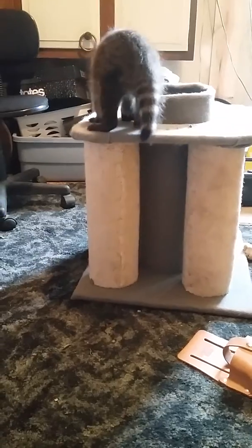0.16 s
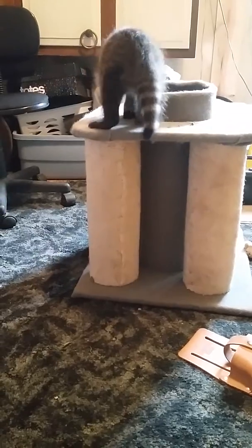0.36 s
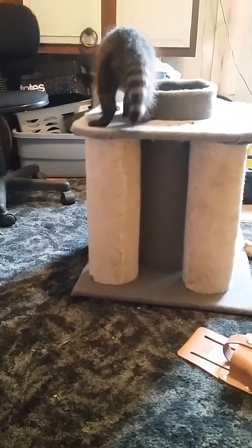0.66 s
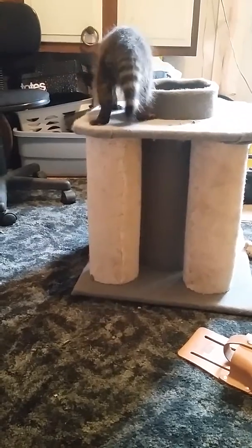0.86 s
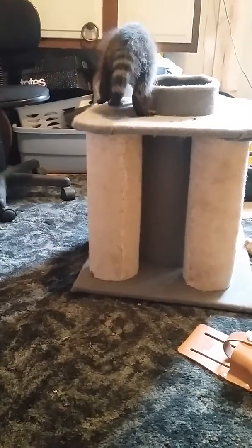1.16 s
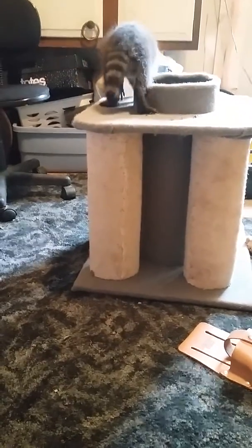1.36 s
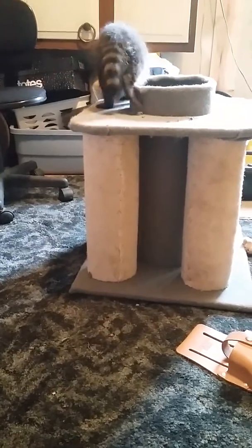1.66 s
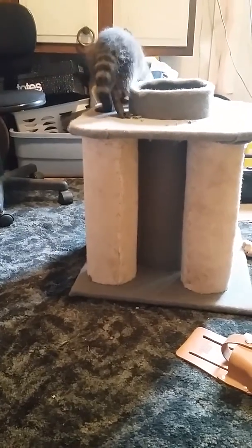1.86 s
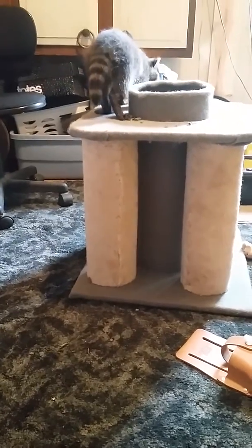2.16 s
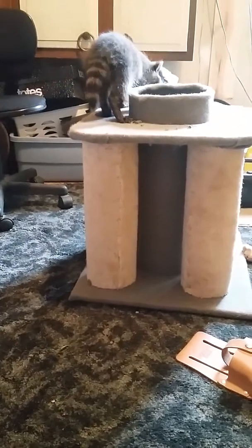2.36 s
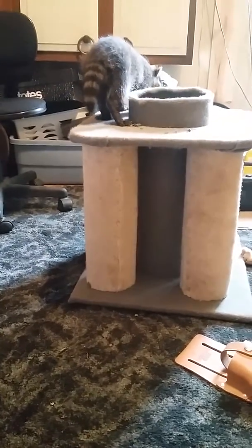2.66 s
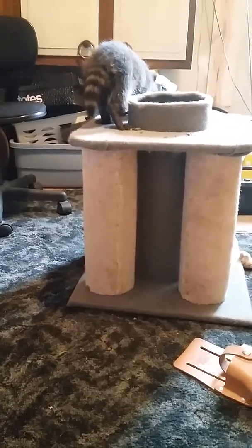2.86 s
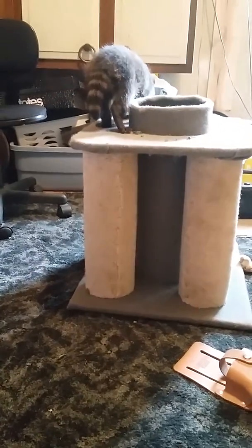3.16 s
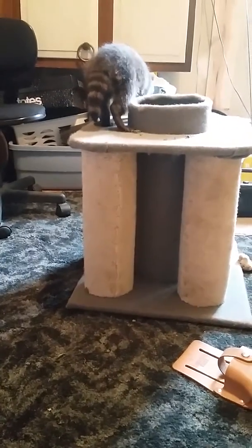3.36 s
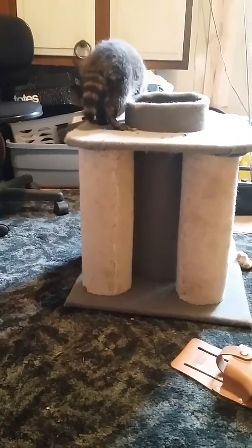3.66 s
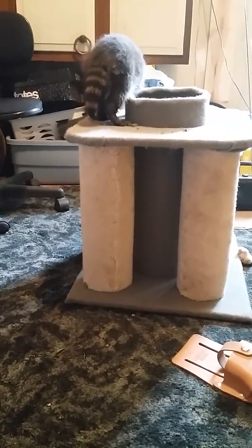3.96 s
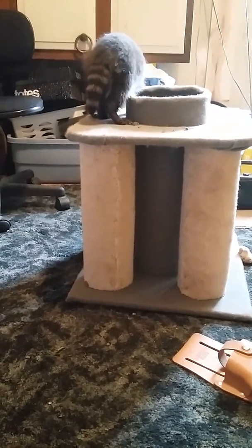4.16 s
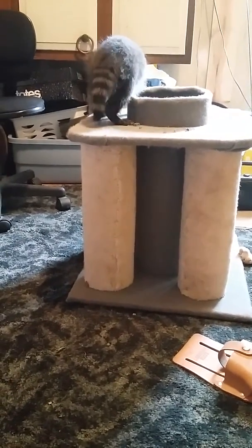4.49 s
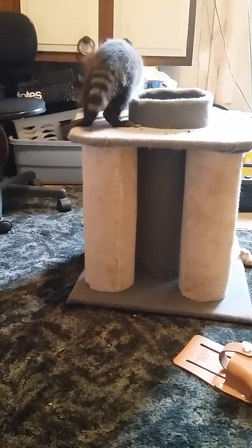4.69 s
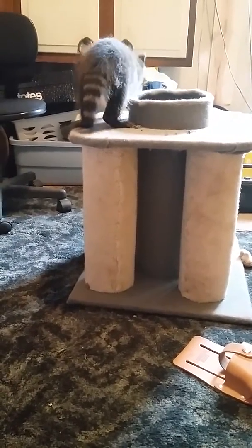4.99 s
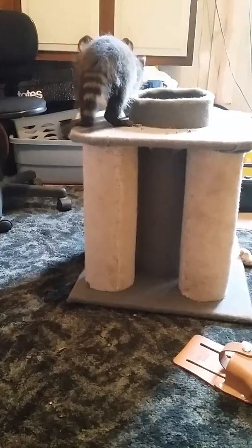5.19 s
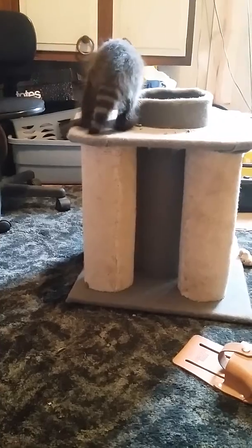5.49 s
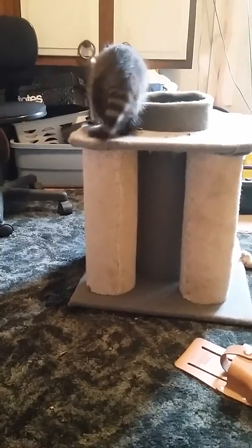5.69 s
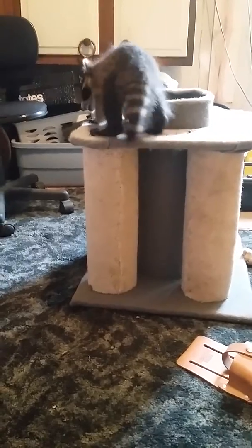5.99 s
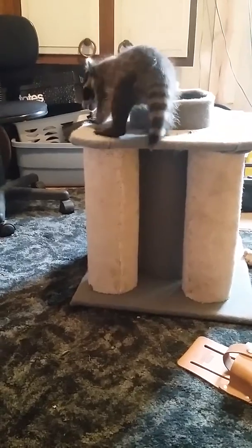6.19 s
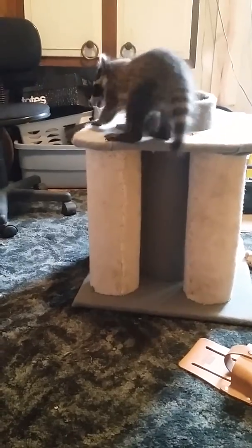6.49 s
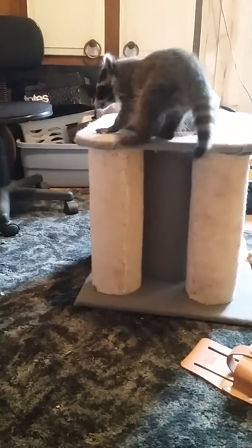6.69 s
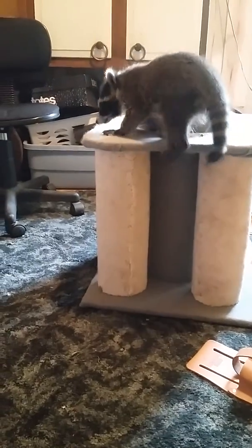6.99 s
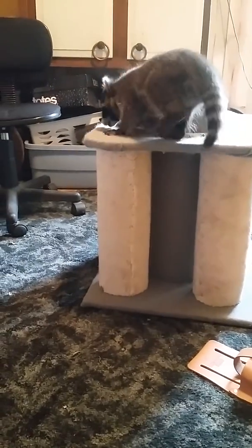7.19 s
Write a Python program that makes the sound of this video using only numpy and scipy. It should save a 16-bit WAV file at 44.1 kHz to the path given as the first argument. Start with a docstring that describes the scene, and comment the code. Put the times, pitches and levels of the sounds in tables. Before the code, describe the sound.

A small room with short reflections, heard by a hand-held stereo camera; the young raccoon is to the right. From 0 to 0.45 s it makes a soft, breathy rattle, about 22 raspy syllables a second with tongue clicks between and a few low croaks. Thin pure whistles, perhaps a bird, peep at 0.7-1.25 s, then slide and dive until 2.1 s. Around them come three quick squawks at 1.55-1.63 s and a tiny rattle at 1.7-1.8 s. A pause holds mostly bumps. At 3.25 s a squawk opens a stronger, more voiced rattle fading by 3.7 s. Squawks at 4.5 and 4.75 s join a long rattle, 4.6-5.35 s, with a sharp click at 4.9 s. Squawks at 5.7-5.9 s lead another, until 6.65 s; two squawks end it at 7.3 s. Throughout, low grip rumble and faint hiss; dull finger thuds cluster at 0-1.3, 1.8-3.9 and 6-7 s, the heaviest near 6.85 s, with faint carpet brushes.

```python
"""A young raccoon chitters on a carpeted cat tree in a small room, right of a hand-held camera.
First a rattle of raspy noise-and-tone syllables, about 22 a second, with tongue clicks (filtered noise) between.
Thin gliding sine whistles, perhaps a bird, follow it and run on past the second bout; later bouts open with
squawks (harmonics plus rasp) before the rattle swells and fades with effort, and squawks alone come last.
Throughout, grip rumble, faint hiss, fingers bumping the left of the camera (sagging sines), soft carpet brushes."""
import sys
import numpy as np
from scipy import signal
from scipy.fft import rfft, irfft, next_fast_len
from scipy.io import wavfile
from scipy.ndimage import map_coordinates

SR = 44100
rng = np.random.default_rng(int(sys.argv[2]) if len(sys.argv) > 2 else 0)


def wav_record(signal):
    """Record a signal, one row per channel, as 16-bit PCM in the file named by sys.argv[1]."""
    frames = np.transpose(np.atleast_2d(signal))
    bounded = np.clip(frames, -1, 1)
    # unit amplitude maps onto the largest positive 16-bit level
    quanta = np.round(bounded * 32767).astype(np.int16)
    wavfile.write(sys.argv[1], SR, quanta)


N = 323694

# rumble of the gripping hand, before the channel gains: (time [s], level [dB])
GRIP_LEVELS = [(0.0, -68), (0.22, -55.5), (0.69, -65), (0.88, -57.5), (0.98, -59), (2.19, -58), (2.55, -61),
               (2.96, -54.5), (3.27, -59), (3.56, -54.5), (3.66, -57), (4.48, -61.5), (4.7, -56.5),
               (4.93, -56.5), (5.42, -59), (6.75, -57.5), (6.99, -53.5), (7.34, -58.5)]
# colour of the grip rumble: (frequency [Hz], gain [dB])
RUMBLE_SPECTRUM = [(15, -50), (25, -43), (45, -3.5), (86, 5), (189, -9.5), (313, -24), (413, -23),
                   (569, -31), (600, -26), (780, -39), (1320, -120)]
# colour of the faint hiss: (frequency [Hz], gain [dB])
AIR_SPECTRUM = [(120, -49), (200, -14), (273, -7.5), (371, -16), (874, -14.5), (2020, -18), (2560, -18),
                (5010, -23), (8660, -27.5), (15500, -30)]
GRIP_UNREST_DB = 3.4

# early echoes: (delay [s], gain [dB])
WALL_ECHOES = [(.0031, -18), (.0074, -20), (0.0127, -7.5)]
# reverberation: (frequency [Hz], T60 [s])
ROOM_T60 = [(200, 0.29), (3000, 0.28), (10000, 0.16)]
# response of the left microphone, facing away: (frequency [Hz], gain [dB])
LEFT_SHADOW = [(300, -9.5), (700, -7), (1300, -15), (2400, -15), (3300, -22.5), (4400, -53), (8000, -20),
               (15000, -2)]
TOP_HZ = 15720

# faint swishes: carpet brushes, and near 1.15 s a distant bird: (time [s], half length [s], relative level
# [dB])
BRUSHES = [(1.14, 0.026, -67), (1.15, 0.19, -72), (2.158, 0.29, -69), (5.44, 0.015, -59.5),
           (6.638, 0.0082, -56), (6.81, 0.29, -67)]
BRUSH_UNREST_DB = 3

# finger bumps: (time [s], thud level [dB], pitch scale [Hz], relative tap level [dB])
BUMPS = [(-.002, -25, 118, -20.5), (.2, -32, 117, -20), (0.308, -37, 250, -23), (0.377, -37.5, 131, -8),
         (.646, -27, 112, -25), (0.667, -33.5, 89, -19), (.86, -35.5, 90, -35), (0.917, -36.5, 118, -20),
         (1.294, -34, 192, -28), (1.319, -24.5, 110.4, -17.5), (1.812, -44, 232, -28),
         (2.139, -31.5, 118, -14.5), (2.213, -27, 114, -54), (2.477, -28.5, 126, -22),
         (2.629, -22.5, 106, -21.5), (2.811, -23, 142, -26.5), (2.92, -32.5, 108, -26),
         (2.986, -32, 85.5, -34), (3.331, -32, 102, -29), (3.442, -30.5, 86, -34),
         (3.628, -32.5, 107, -20.5), (3.74, -37, 118, -25), (3.907, -27, 100, -22.5),
         (6.021, -27, 119, -23), (6.126, -29.5, 185, -15), (6.207, -32, 173, -10.5),
         (6.597, -26.5, 105.4, -23), (6.849, -17, 137, -61), (6.902, -29.5, 118, -26),
         (6.976, -26, 104, -29), (7.031, -36, 89.5, -16.5)]
# modes of the case: (frequency [Hz], level [dB])
TAP_MODES = [(330, 10.5), (470, 6), (660, -2)]
# what a bump leaves at the right microphone: (frequency [Hz], gain [dB])
FAR_SIDE_SPECTRUM = [(100, -50), (300, -14), (900, -36)]

# whistles: (time [s], shape name, relative level [dB])
WHISTLES = [(.691, "peep", -63), (.786, "peep", -54), (.883, "peep", -52), (.975, "peep", -51.5),
            (1.09, "peep", -49.5), (1.2, "peep", -55.5), (1.37, "slide", -47.5), (1.705, "low slide", -50),
            (1.906, "pip", -51), (1.927, "dive", -40.5), (2.041, "pip", -47.5), (2.064, "dive", -43.5)]
# by shape name: (length [s], start [Hz], turning pitch [Hz], end [Hz], turning point [share of length])
WHISTLE_SHAPES = {"peep": (0.044, 2600, 2255, 2500, 0.5), "slide": (0.16, 2980, 2580, 2630, 0.67),
                  "low slide": (.12, 2490, 2060, 2030, 1.1), "pip": (0.035, 3810, 3690, 3400, 0.61),
                  "dive": (.052, 3580, 2625, 2940, 0.78)}

# squawks: (time [s], half length [s], peak pitch [Hz], relative level [dB],
#           rasp re squawk level [dB], mouth opening [dB])
SQUAWKS = [(1.548, 0.0029, 978, -35, -6.5, 2), (1.585, 0.0043, 1016, -32.5, -8.5, -0.5),
           (1.627, 0.0052, 968, -40.5, -1.5, 10), (3.25, 0.0069, 1198, -33, -6.5, 13.5),
           (4.506, 0.0054, 1108, -28.5, -14, 2.5), (4.544, 0.0058, 1078, -38, -2.5, 2),
           (4.764, 0.0064, 980, -39.5, -4, 10), (5.7166, 0.0035, 1102, -31.5, -7, 1),
           (5.792, 0.0092, 1075, -39.5, -1, 4), (5.873, 0.0051, 992, -41.5, -2, 13),
           (7.28, 0.0059, 996, -39.5, -4.5, -6), (7.319, 0.0058, 1034, -36, -3, 6.5)]
# squawk harmonics: (multiple of the pitch, level [dB])
SQUAWK_HARMONICS = [(1, -14.5), (2, -8), (3, 8.5), (4, -11.5), (5, -11.5), (6, -20.5), (7, -24.5),
                    (8, -26.5)]
# colour of the squawk rasp: (frequency [Hz], gain [dB])
RASP_SPECTRUM = [(400, -46), (900, -2.5), (1350, -6), (2000, 10), (2550, 1), (3100, 7.5), (3900, 3.5),
                 (4700, -9), (6200, -4.5), (8500, -12.5), (12000, -25.5), (16000, -30)]
SQUAWK_JITTER = 0.026  # share of the pitch

# broad mouth colour of a syllable: (frequency [Hz], gain [dB])
MOUTH_SPECTRUM = [(300, -5), (700, -3.5), (1000, -9), (1400, -8), (1850, 3), (2400, -3.5), (3000, -11),
                  (5000, -65)]
# colour of a syllable's puff: (frequency [Hz], gain [dB])
HISS_SPECTRUM = [(1500, -17), (3600, 0.5), (4800, 1), (5600, 4), (6400, 2), (7200, 0), (8200, 0),
                 (10000, -3), (12000, -10.5), (16000, -10)]
FLUTTER_HZ, FLUTTER_DEPTH = 291, 0.45  # the air comes in quick puffs
RELEASE_SHARE = 0.13

# soft syllables ahead of squawks: (time [s], effort [dB], mouth opening [dB])
OPENERS = [(3.214, -50, -2.5), (4.469, -54.5, -10), (7.244, -56.5, 2.5)]
OPENER_THROAT_HZ, OPENER_MOUTH_HZ, OPENER_VOICED, OPENER_CLICK_DB = 3430, 1640, 0.7, -44.5

# low croaks on stressed syllables: (time [s], mouth resonance [Hz], relative level [dB])
CROAKS = [(0.162, 810, -55), (0.255, 800, -51), (.35, 800, -52.5), (1.766, 820, -58.5), (3.509, 950, -49.5),
          (5.21, 830, -55)]
CROAK_THROAT_HZ, CROAK_THROAT_DB, CROAK_HISS_DB, CROAK_VOICED = 3262, 2.5, -5.5, 0.29
# sharpest tongue clicks: (time [s], relative level [dB])
SHARP_CLICKS = [(.0075, -40.5), (0.2094, -46), (0.2542, -47), (4.85, -47), (4.893, -30), (5.161, -46),
                (5.026, -45), (6.244, -36), (6.333, -33)]

# rattles: (first syllable [s], end [s], first gap [s], gap growth [s per syllable])
RATTLES = [(.023, .455, .0477, -.0004), (1.68, 1.82, .042, -.001), (3.289, 3.71, .0445, -.00016),
           (4.632, 5.36, .0454, -.00016), (5.834, 6.66, .0409, .00038)]
# voice of each rattle at full effort: (voiced share [0-1], relative hiss level [dB],
#                                       throat resonance [Hz], half length scale [s])
VOICES = [(0.2, -59.5, 2940, 0.0036), (.3, -62.5, 3300, 0.0047), (0.93, -57, 2960, 0.0038),
          (0.56, -57.5, 2860, 0.0057), (0.55, -57.5, 3000, 0.0043)]
# one list per rattle: (time [s], effort [dB], mouth opening [dB], mouth resonance [Hz])
EFFORT_CURVES = [
    [(0.02, -55, -4, 1600), (.16, -53.5, -3.5, 1350), (.33, -56, -13, 1500), (.43, -62, -19, 1400)],
    [(1.68, -51.5, -3.5, 1400), (1.8, -66, 3.5, 1900)],
    [(3.29, -44.5, -4.5, 1600), (3.38, -45.5, -0.5, 1530), (3.47, -47.5, 2, 1500), (3.55, -52, -3, 1750),
     (3.68, -59.5, -3, 1600)],
    [(4.63, -47, -9, 1600), (4.72, -45.5, -6.5, 1800), (4.83, -44, -12, 1420), (4.94, -45, -6.5, 1700),
     (5.05, -49, -9.5, 1550), (5.17, -46, -10, 1600), (5.25, -55.5, -10.5, 1400), (5.34, -61.5, -9, 1400)],
    [(5.83, -50, -6, 1620), (5.96, -47, -4.5, 1700), (6.04, -55.5, 2, 1650), (6.09, -48, -12, 1340),
     (6.18, -45.5, -8, 1360), (6.27, -48.5, -2, 1340), (6.43, -46, -6, 1480), (6.53, -55, -3.5, 1700),
     (6.64, -55.5, -7, 1500)],
]
FULL_EFFORT_DB = -45.5
VOICE_FADE_DB = 11  # this far under full effort the voiced share is 1/e
THROAT_HZ_PER_DB = -36.5  # the throat resonance sinks with effort
HISS_DB_PER_DB = 0.12  # hiss over effort
SCATTER_DB, THROAT_SCATTER, MOUTH_SCATTER = 0.5, 0.02996, 0.0495  # per syllable; the last two are shares
CLICK_LEAD_S, CLICK_DB, CLICK_SCATTER_DB = 0.0195, -1.5, 5  # ahead of the syllable; level re effort


def amp(db):
    """Decibels to amplitude."""
    return 10 ** (np.asarray(db) / 20)


def unit(x):
    """x scaled to an RMS of 1."""
    return x / np.sqrt(np.mean(x ** 2) + 1e-20)


def along(points, hz):
    """(frequency [Hz], value) points interpolated on a log frequency axis."""
    f, v = np.transpose(points)
    return np.interp(np.log(hz + 1), np.log(f + 1), v)


def filtered(x, response):
    """x times a response of frequency."""
    n = x.shape[-1]
    m = next_fast_len(n + 2048)
    return irfft(rfft(x, m) * response(np.fft.rfftfreq(m, 1 / SR)), m)[..., :n]


def coloured(x, spectrum):
    """x through a (frequency [Hz], gain [dB]) spectrum."""
    return filtered(x, lambda hz: amp(along(spectrum, hz)))


def wobble(rate_hz, size):
    """A random curve of straight lines between rate_hz knots a second."""
    return map_coordinates(rng.standard_normal(size), [np.arange(size) * rate_hz / SR + 2], order=1)


def add(track, s, sound):
    """Mix a sound into the track from time s on."""
    i = round(s * SR)
    part = sound[max(-i, 0):N - i]
    track[max(i, 0):max(i, 0) + len(part)] += part


def placed(sounds):
    """A track of (time [s], sound) pairs, each sound centred on its time."""
    out = np.zeros(N)
    for s, sound in sounds:
        add(out, s - len(sound) / SR / 2, sound)
    return out


def bell(t, width_s):
    """A Gaussian swell around t = 0."""
    return np.exp(-.5 * (t / width_s) ** 2)


def matched(x, shape):
    """x with the energy of the given envelope."""
    return unit(x) * np.sqrt(np.mean(shape ** 2))


def resonance(hz, centre_hz, width_hz):
    """A steep-sided resonance: two like band-passes in a row."""
    return (1j * hz * width_hz / (centre_hz ** 2 - hz ** 2 + 1j * hz * width_hz)) ** 2


def background():
    """The gripping hand rumbles, mostly at the left microphone, over a faint even hiss."""
    grip_db = np.interp(np.arange(N) / SR, *np.transpose(GRIP_LEVELS))
    rumble = unit(coloured(rng.standard_normal((2, N)), RUMBLE_SPECTRUM))
    rumble = rumble * amp(grip_db + GRIP_UNREST_DB * wobble(22, size=N))
    air = unit(coloured(rng.standard_normal((2, N)), AIR_SPECTRUM))
    return rumble * amp([[9], [-15]]) + air * amp([[-66], [-65.6]])


def room(x, wet_db=-5.0, left_wet_db=-3, left_lag_s=0.000243):
    """Near cupboard doors echo and the room rings briefly; the left microphone, facing away, hears it later."""
    def echoes(hz):
        return 1 + sum(amp(db) * np.exp(-2j * np.pi * hz * delay_s) for delay_s, db in WALL_ECHOES)

    near = filtered(x, echoes)
    wet = np.zeros((2, N))
    block = SR // 4
    for i in range(0, N, block):  # a new tail per block, for the moving animal
        hz, t, z = signal.stft(rng.standard_normal((2, SR // 3)), SR, nperseg=256)
        decay = amp(-60 * t / along(ROOM_T60, hz)[:, None])
        onset = 1 - np.exp(-t / 0.006)
        tails = signal.istft(z * decay * onset, SR, nperseg=256)[1]
        for side, tail in zip(wet, tails):
            add(side, i / SR, signal.fftconvolve(x[i:i + block], tail / np.linalg.norm(tail)))

    def shadow(hz):
        return amp(along(LEFT_SHADOW, hz)) * np.exp(-2j * np.pi * hz * left_lag_s)

    left = filtered(near + amp(left_wet_db) * wet[0], shadow)
    return np.array([left, near + amp(wet_db) * wet[1]])


def brushes(centre_hz=5400, width_hz=3200):
    """Fur and paws brush the carpet, and a distant bird sounds faintly near 1.15 s: faint swishes of band-
    passed noise."""
    t = np.arange(N) / SR
    stroke = sum(amp(db) * bell(t - s, half_s) for s, half_s, db in BRUSHES)
    stroke = stroke * amp(BRUSH_UNREST_DB * wobble(60, size=N))
    return stroke * unit(filtered(rng.standard_normal(N), lambda hz: resonance(hz, centre_hz, width_hz)))


def bumps(rise_s=0.0053, sag=1.0, tap_t60_s=0.016):
    """A finger pushes the case: a short thud that sags in pitch, with a dull tap of case modes."""
    out, t = np.zeros(N), np.arange(4096) / SR
    modes = sum(amp(db) * np.sin(2 * np.pi * hz * t) for hz, db in TAP_MODES)
    tap = (1 - np.exp(-t / 0.0027)) * amp(-60 * t / tap_t60_s) * modes
    tap = tap / np.abs(tap).max()
    for s, db, hz, tap_db in BUMPS:
        phase = 2 * np.pi * np.cumsum(hz * (0.73 + sag * np.exp(-t / 0.006))) / SR
        thud = (t / rise_s * np.exp(1 - t / rise_s)) ** 1.4 * np.sin(phase)
        add(out, s, amp(db) * (thud + amp(tap_db + 12.5) * tap))
    return np.array([out, coloured(out, FAR_SIDE_SPECTRUM)])


def whistles():
    """Pure notes that swell and slide down; most turn up a little at the end."""
    out = np.zeros(N)
    for s, shape, db in WHISTLES:
        length_s, start_hz, low_hz, end_hz, turn = WHISTLE_SHAPES[shape]
        u = np.linspace(0, 1, round(length_s * SR))
        turn = np.clip(turn, .1, .95)
        before = (start_hz - low_hz) * (1 - u / turn) ** 2
        after = (end_hz - low_hz) * ((u - turn) / (1 - turn)) ** 2
        pitch_hz = low_hz + np.where(u < turn, before, after)
        phase = 2 * np.pi * np.cumsum(pitch_hz * (1 + .004 * wobble(250, size=len(u)))) / SR
        swell = np.abs(np.sin(np.pi * u)) ** 0.53 * amp(1.5 * wobble(132, size=len(u)))
        add(out, s, amp(db - 6.5) * unit(swell * np.sin(phase)))
    return out


def squawks(arch=0.03566, shimmer_db=4.5):
    """Short strained notes: the throat favours the third harmonic, mouth opening sets the two below it."""
    out, t = np.zeros(N), np.arange(-2048, 2048) / SR
    for s, half_s, hz, db, rasp_db, open_db in SQUAWKS:
        swell = bell(t, half_s)
        pitch_hz = hz * (1 + arch * (bell(t, 2 * half_s) - 1) + SQUAWK_JITTER * wobble(931, size=len(t)))
        phase = 2 * np.pi * np.cumsum(pitch_hz) / SR
        tone = np.zeros(len(t))
        for k, level_db in SQUAWK_HARMONICS:
            tone += amp(level_db + open_db * (k <= 2) + rng.normal(0, 1)) * np.sin(k * phase)
        tone = matched(tone * swell * amp(shimmer_db * wobble(273, size=len(t))), swell)
        air = bell(t - .002, half_s + 0.0057)
        cycle_puffs = 1 + .5 * np.cos(phase)  # air escapes once a cycle
        rasp = coloured(rng.standard_normal(len(t)) * air * cycle_puffs, RASP_SPECTRUM)
        add(out, s + t[0], amp(db) * (tone + amp(rasp_db - 3.5) * matched(rasp, air)))
    return out


def click(db, width_s=0.0011):
    """The tongue snaps and rings the throat for a few milliseconds."""
    t = np.arange(-512, 512) / SR
    burst = rng.standard_normal(len(t)) * bell(t, width_s)
    snap = filtered(burst, lambda hz: resonance(hz, centre_hz=2830, width_hz=1250))
    return amp(db - 15) * unit(snap)


def syllable(throat_hz, mouth_hz, throat_db, mouth_db, hiss_db, voiced, width_s=0.004, jitter=0.032,
             fall=0.05004, throat_width_hz=1400, mouth_width_hz=600, breadth_db=0):
    """Shaky sagging voice and rasp share the throat and mouth resonances, with a puff of hiss."""
    t = np.arange(-2048, 2048) / SR
    voiced = np.clip(voiced, 0, 1)
    length_s = width_s * np.exp(rng.normal(0, .12))
    swell = bell(t, np.where(t < 0, 0.84 * length_s, 0.93 * length_s))
    swell = swell + RELEASE_SHARE * bell(t - .002, 0.023)  # slower release
    puffs = 1 + FLUTTER_DEPTH * np.cos(2 * np.pi * (FLUTTER_HZ * t + rng.random()))
    blow = swell * puffs * amp(2.9 * wobble(509, size=len(t)))
    # running time, warped by the falling, shaky pitch
    cycles = np.cumsum(1 - fall * np.tanh(t / 0.015) + jitter * wobble(1106.5, size=len(t))) / SR
    noise = rng.standard_normal((4, len(t)))

    def throat_response(hz):
        return resonance(hz, throat_hz + 200, throat_width_hz) / (1 + (hz / 4300) ** 12)

    throat = unit(filtered(noise[0] * blow, throat_response))
    mouth = unit(filtered(noise[1] * blow, lambda hz: resonance(hz, mouth_hz, mouth_width_hz)))
    mouth = unit(mouth + amp(breadth_db) * unit(coloured(noise[2] * blow, MOUTH_SPECTRUM)))
    hiss = coloured(noise[3] * (bell(t - .002, 0.015) + 0.5 * swell), HISS_SPECTRUM)
    sound = amp(hiss_db - 9.0) * unit(hiss)
    for rasp, hz, db in [(throat, throat_hz, throat_db), (mouth, mouth_hz, mouth_db)]:
        voice = unit(blow * np.sin(2 * np.pi * hz * cycles))
        sound += amp(db - 7.5) * (np.sqrt(voiced) * voice + np.sqrt(1 - voiced) * rasp)
    return sound


def openers():
    """One click and one soft syllable lead into the squawks."""
    sounds = []
    for s, db, open_db in OPENERS:
        soft = syllable(OPENER_THROAT_HZ, OPENER_MOUTH_HZ, db, db + open_db, db - 12.5, OPENER_VOICED)
        sounds.append((s, soft))
        sounds.append((s - CLICK_LEAD_S, click(OPENER_CLICK_DB)))
    return placed(sounds)


def accents():
    """Low croaks, with a low mouth resonance, and sharp clicks stand out of the rattle."""
    sounds = [(s, click(db)) for s, db in SHARP_CLICKS]
    for s, hz, db in CROAKS:
        croak = syllable(CROAK_THROAT_HZ, hz, db + CROAK_THROAT_DB, db, db + CROAK_HISS_DB, CROAK_VOICED)
        sounds.append((s, croak))
    return placed(sounds)


def rattle():
    """Click and syllable alternate at a drifting pace; effort makes them louder, lower and more voiced."""
    sounds = []
    for (s, end_s, gap_s, growth_s), voice, controls in zip(RATTLES, VOICES, EFFORT_CURVES):
        voiced, hiss_db, throat_hz, width_s = voice
        times, *columns = np.transpose(controls)
        while s < end_s:
            db, open_db, mouth_hz = (np.interp(s, times, column) for column in columns)
            push_db = db - FULL_EFFORT_DB
            size, throat, mouth, snap = rng.standard_normal(4)
            db += SCATTER_DB * size
            sound = syllable(
                (throat_hz + THROAT_HZ_PER_DB * push_db) * (1 + THROAT_SCATTER * throat),
                mouth_hz * (1 + MOUTH_SCATTER * mouth),
                db, db + open_db, hiss_db + HISS_DB_PER_DB * push_db,
                voiced * np.exp(min(push_db, 0) / VOICE_FADE_DB), width_s)
            sounds.append((s, sound))
            sounds.append((s - CLICK_LEAD_S, click(db + CLICK_DB + CLICK_SCATTER_DB * snap)))
            s += gap_s + growth_s / 2
            gap_s += growth_s
    return placed(sounds)


def scene():
    """Animal and whistles sound in the room; bumps and grip reach the microphones directly."""
    voice = amp(2.5) * squawks() + amp(1.5) * (rattle() + openers() + accents())
    return room(voice + whistles() + amp(-4) * brushes()) + bumps() + background()


def record(dry):
    """The camera thins the deepest bass (third order, 48 Hz) and keeps nothing from TOP_HZ up."""
    return filtered(dry, lambda hz: (hz < TOP_HZ) * hz ** 3 / np.sqrt(hz ** 6 + 48 ** 6))


dry = scene()
out = record(dry)
wav_record(out)
```